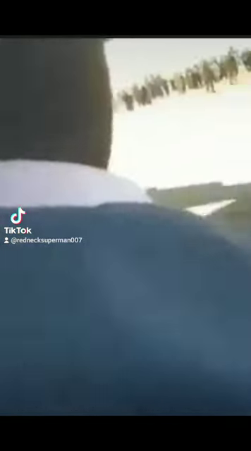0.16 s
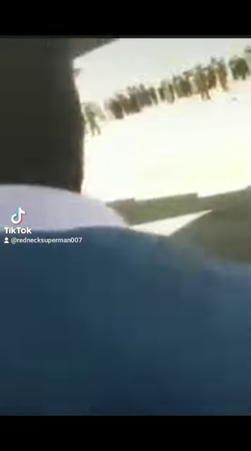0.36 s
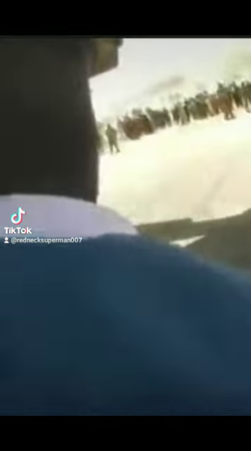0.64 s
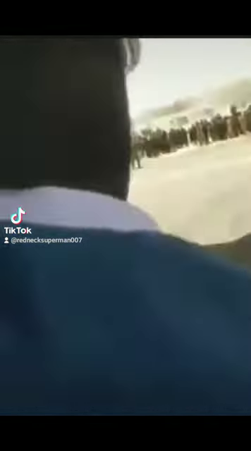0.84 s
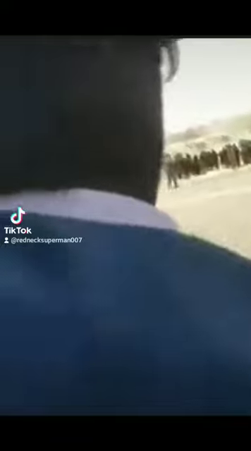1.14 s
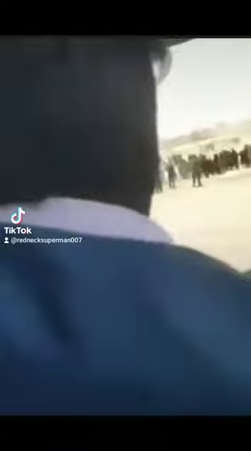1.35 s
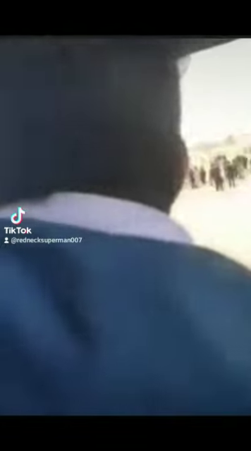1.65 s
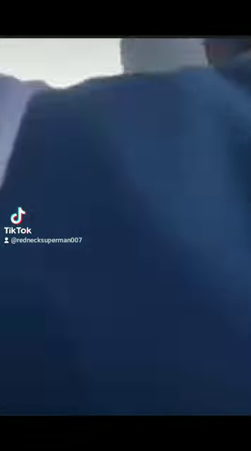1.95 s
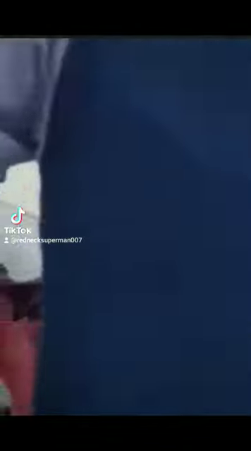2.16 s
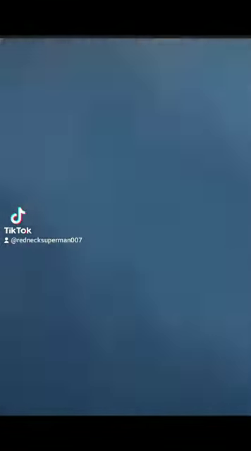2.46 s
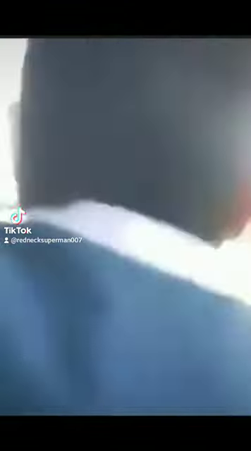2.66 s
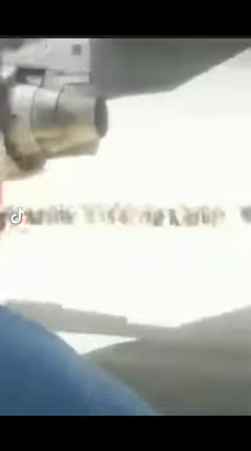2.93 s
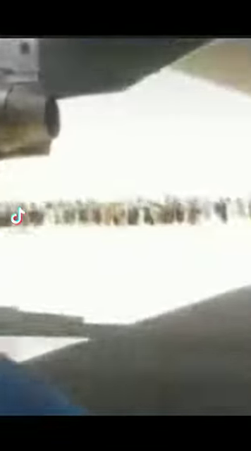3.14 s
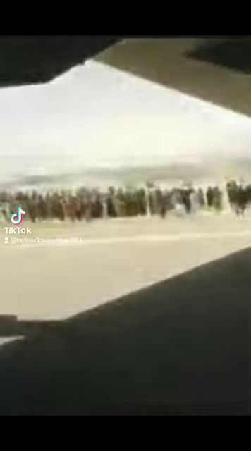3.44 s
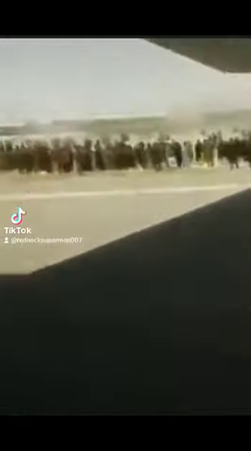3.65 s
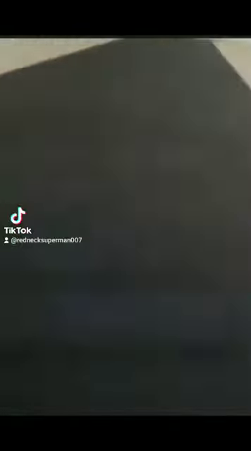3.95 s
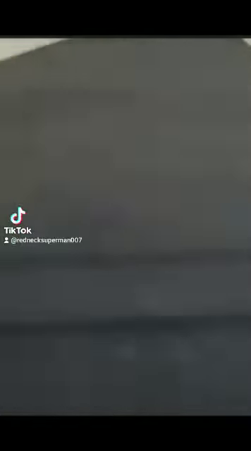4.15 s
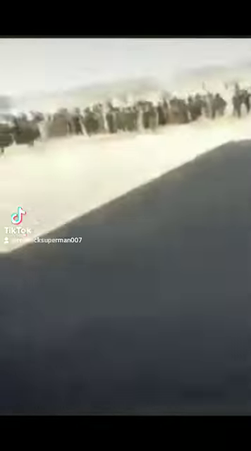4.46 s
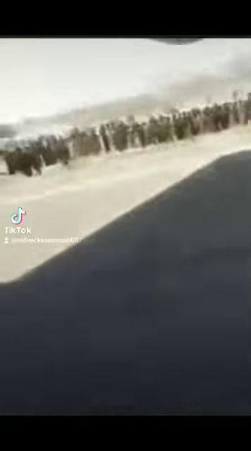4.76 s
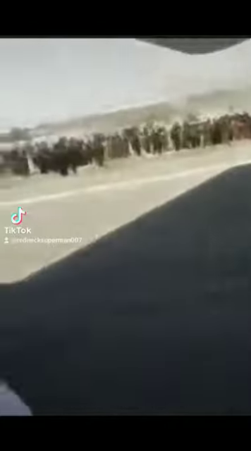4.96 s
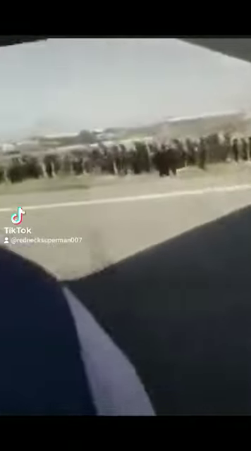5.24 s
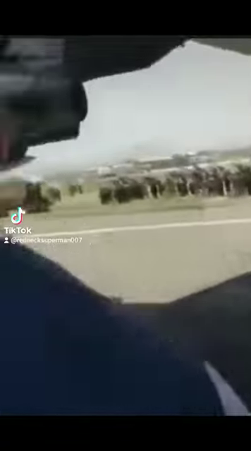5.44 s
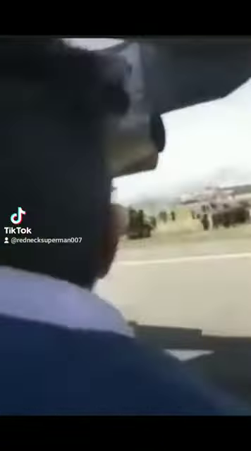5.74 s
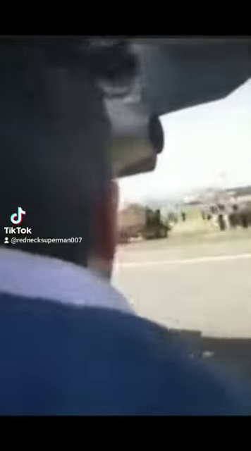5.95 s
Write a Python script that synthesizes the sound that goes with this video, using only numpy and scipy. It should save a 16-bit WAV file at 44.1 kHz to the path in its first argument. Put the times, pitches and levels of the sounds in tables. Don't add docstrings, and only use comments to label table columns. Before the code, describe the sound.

A harsh, loud engine blast passes, drops suddenly, then swells into steady jet roar with deep rumble and wavering fan howls.

```python
import sys
import numpy as np
from scipy import signal
from scipy.fft import rfft, irfft
from scipy.io import wavfile
from scipy.ndimage import uniform_filter1d

SR = 44100
rng = np.random.default_rng(int(sys.argv[2]) if len(sys.argv) > 2 else 0)


def output_pcm(signal):
    pcm = np.clip(np.atleast_2d(signal).T, -1, 1) * 32767
    wavfile.write(sys.argv[1], SR, np.round(pcm).astype(np.int16))


def amplitude_ratio(level_db):
    exponent = np.asarray(level_db, float) / 20
    return 10 ** exponent


N = 269010
SIZE, HOP = 1024, 256
HZ = np.fft.rfftfreq(SIZE, 1 / SR)
BIN_HZ = HZ[:, None]
TIMES = np.arange(N // HOP + 5) * HOP / SR
EARLY_END_S = 0.74


def engines():
    # (time [s], exposure [dB])
    exposure = [(0.0, 1), (0.3, 1.1), (0.42, 1), (0.54, 2), (0.6, -0.5), (0.71, -0.5), (0.77, -9),
                (1.1, -10.5), (1.72, -9), (1.95, -5), (2.12, -2.5), (2.6, -1.5), (3.9, -1), (4.4, -2),
                (4.6, -1.2), (5.4, -3), (6.1, -1.5)]
    steady_db = [-23.5, -26.5, -19.5]
    follows = [0.78, 0.89, 0.74]
    early_db = [-8, 1, -0.5]
    # (frequency [Hz], density [dB per Hz])
    rumble_spectrum = [(20, -54), (35, -30.5), (60, -11.5), (120, -4), (200, -6), (290, 1), (400, -0.5),
                       (550, -13), (900, -40.5)]
    blast_spectrum = [(250, -17.5), (500, -2.5), (780, 0.5), (1100, -4), (1800, -3), (2500, -5),
                      (3500, -11), (5000, -69)]
    roar_spectrum = [(1200, -55), (2200, -13), (3000, -4.5), (4000, 2.5), (5000, 1), (5800, -2.5),
                     (6500, -7.5), (7200, -15.5), (7550, -26), (7750, -38), (8080, -35), (8160, -63)]
    # (frequency [Hz], gain [dB])
    deep_bass = [(25, -16), (70, -18), (150, 1), (250, 3)]
    # (time [s], half length [s], gain [dB])
    gusts = [
        (1.3, 0.14, 3.5),
        (2.3, 0.61, 1.5),
        (4.1, 0.25, -1.5),
        (5.15, 0.039, 5),
        (5.6, 0.31, 1.5),
    ]
    early_tilt_db, early_chop_db = 1, 2.2

    early = 1 / (1 + np.exp((TIMES - EARLY_END_S) / 0.011))
    levels_db = np.c_[steady_db] + np.c_[follows] * over_time(exposure) + np.c_[early_db] * early
    rumble_db, blast_db, roar_db = levels_db

    rumble_db = rumble_db + swells(gusts)[0] + 3.0
    rumble = layer(rumble_spectrum, rumble_db, patchy_db=1.6, hz=90, s=0.05)
    held_down = np.clip(1.1 - TIMES / 1.1, 0, 2)
    rumble = rumble * amplitude_ratio(2 * over_hz(deep_bass) * held_down)

    tilt_db = early_tilt_db * np.outer(np.log2(HZ / 1000 + 0.26), early)
    blast_db = blast_db + early * blast_core_db() + 8.5 + tilt_db
    blast = layer(blast_spectrum, blast_db, patchy_db=2.5, hz=200, s=0.02)

    roar_db = roar_db + 5.5 + fan_howls_db()
    roar = layer(roar_spectrum, roar_db, patchy_db=2.5, hz=200, s=0.02)

    chop = amplitude_ratio(2 * early_chop_db * early * patches(700, 0.025))
    return np.sqrt(rumble + (blast + roar) * chop)


def blast_core_db():
    # (time [s], centre [Hz], level over the blast [dB])
    core = [
        (0.0, 1250, 1),
        (0.2, 1610, 0.5),
        (0.45, 2100, 6.5),
        (0.62, 2050, 2.5),
        (0.75, 1900, 8.5),
    ]
    core_hz, core_db = over_time(core)
    return core_db * np.exp(-((BIN_HZ - core_hz) / 320) ** 2)


def fan_howls_db():
    # (time [s], upper [Hz], lower [Hz], upper over the roar [dB], lower over the roar [dB])
    howls = [(0.0, 3830, 3110, -5, -1), (0.35, 3960, 3170, 3.5, 5.5), (0.7, 3770, 3060, 2.5, 3),
             (0.95, 3950, 2900, 7, 3), (1.3, 4040, 3040, 1.5, 4.5), (1.9, 4080, 3120, 0.5, 3.5),
             (2.4, 4030, 2930, 3.5, 4.5), (3.3, 3900, 3240, -0.5, 3), (3.65, 3920, 3070, 1.5, 3.5),
             (4.05, 4200, 2980, 0.5, 2), (4.3, 3970, 2950, -2.5, 5), (4.6, 4150, 2910, -2, 5),
             (4.95, 4000, 3140, 1.5, 2.5), (5.15, 3940, 2940, 4, 0), (5.7, 4010, 3090, 2.5, 5),
             (6.1, 4200, 3130, 2, 0)]
    howl_width_hz = [260, 240]
    wander_db, upper_trim_db = -1.86, -3
    upper_hz, lower_hz, upper_db, lower_db = over_time(howls)
    total_db = 0
    for hz, db, width_hz in zip((upper_hz, lower_hz), (upper_db + upper_trim_db, lower_db), howl_width_hz):
        hump = np.exp(-((BIN_HZ - hz) / width_hz) ** 2)
        total_db = total_db + (db + wander_db * wander()) * hump
    return total_db


def layer(spectrum, level_db, patchy_db, hz, s):
    power = amplitude_ratio(over_hz(spectrum)) ** 2
    return power / power.sum() * amplitude_ratio(level_db + patchy_db * patches(hz, s)) ** 2


def patches(hz, s):
    field = rng.standard_normal((len(TIMES), len(HZ))).T
    wide = max(round(hz * SIZE / SR), 1)
    long = max(round(s * SR / HOP), 1)
    for _ in range(2):
        field = uniform_filter1d(field, wide, axis=0)
        field = uniform_filter1d(field, long, axis=1)
    return evened(field)


def wander():
    wide = max(round(0.12 * SR / HOP), 1)
    drift = uniform_filter1d(rng.standard_normal(len(TIMES)), wide)
    return evened(uniform_filter1d(drift, wide))


def swells(rows):
    s, half_s, *columns = np.transpose(rows)
    bumps = np.exp(-((TIMES[:, None] - s) / half_s) ** 4)
    return [bumps @ c for c in columns]


def over_time(rows):
    s, *columns = np.transpose(rows)
    return [np.interp(TIMES, s, c) for c in columns]


def over_hz(points):
    hz, value = np.transpose(points)
    return np.interp(np.log(HZ + 1), np.log(hz + 1), value)[:, None]


def evened(x):
    return x / np.sqrt(np.mean(x ** 2) + 1e-20)


def ports():
    # (frequency [Hz], strength [ratio])
    aimed = [(60, 6.5), (200, 1.3), (600, 2.0), (1500, .75), (3000, .9), (4500, 0.22), (7000, 0.1)]
    # (frequency [Hz], share [ratio])
    phase_lead = [(150, 0.0087), (500, 0.11), (900, 0.93), (1400, 0.05)]
    most_alike = 2.05
    alike = None
    lag_ms, share = phone_swings()
    comb = np.cos(2 * np.pi * BIN_HZ * lag_ms / 1000)
    bass = (1.1 + 2.0 * np.clip(TIMES / 0.72, 0, 1) ** 4) * np.exp(-BIN_HZ / 225)
    scatter = 0.45 * patches(260, 0.022) + 0.1 * patches(350, 0.12)
    scatter = scatter * np.clip(BIN_HZ / 900, 0, 1)
    alike = over_hz(aimed) * (share + 0.14) * comb + bass + scatter
    alike = alike - body_echo() + reflections()
    alike = np.tanh(np.minimum(alike, most_alike))

    a, b, c, d = rng.standard_normal((len(TIMES), len(HZ), 4)).T
    lead = np.clip(over_hz(phase_lead), 0, 1)
    mid = a + 1j * b
    side = lead * 1j * mid + np.sqrt(1 - lead ** 2) * (c + 1j * d)
    mid = mid * np.sqrt((1 + alike) / 2)
    side = side * np.sqrt((1 - alike) / 2)
    return np.array([mid + side, mid - side])


def phone_swings():
    # (time [s], half length [s], extra lag [ms], extra share [ratio])
    swings = [(.4, 0.19, -0.02, -0.18), (.97, 0.035, -.08, 0.44), (1.2, 0.11, -0.085, 0.17),
              (1.6, 0.03, -0.14, 0.31), (1.95, 0.17, 0.027, -0.19), (2.27, 0.18, .12, 0.39),
              (2.6, 0.11, 0.1, 0.23), (2.85, 0.099, -0.023, 0.35), (3.35, 0.2, -0.016, 0.13),
              (3.78, 0.12, -0.034, 0.18), (4.05, 0.057, -0.054, 0.24), (4.55, 0.11, -0.054, 0.037),
              (4.83, 0.17, -0.08, 0.2), (5.1, 0.059, -0.052, 0.046), (5.33, 0.066, -0.029, -0.056),
              (5.7, 0.16, -0.012, 0.039), (6.0, 0.087, -0.048, 0.15)]
    rest_lag_ms, rest_share = 0.33, 0.27
    return np.c_[[rest_lag_ms, rest_share]] + swells(swings)


def body_echo():
    lag_ms, from_hz, end_s = 0.46, 1400, 1.7
    echo = np.cos(2 * np.pi * HZ * lag_ms / 1000) * np.clip(HZ / from_hz, 0, 1)
    near = 0.29 * np.exp(-(TIMES / end_s) ** 8)
    lit = 0.24 * np.exp(-(TIMES / EARLY_END_S) ** 8)
    return np.outer(echo, near + lit)


def reflections():
    # (time [s], half length [s], frequency [Hz], strength [ratio])
    joined = [(.05, 0.045, 2620, 0.97), (.16, .03, 5330, 0.9), (.41, 0.045, 2970, 1),
              (.42, 0.037, 5730, 0.73), (.52, 0.049, 3030, 0.94), (.61, 0.023, 3010, 0.83),
              (.79, 0.039, 2220, 1.2), (.97, 0.046, 3320, 1), (1.22, .05, 3260, 0.82),
              (1.34, 0.031, 5430, 0.84), (1.49, 0.029, 3270, 1.5), (1.56, .05, 5400, 1.6),
              (1.65, 0.043, 3280, 1.4), (1.82, .04, 2710, 1.2), (2.0, 0.014, 3500, 1.6),
              (2.05, 0.038, 2420, 1.7), (2.09, 0.047, 1810, 0.99), (2.14, 0.068, 2550, 0.93),
              (2.41, 0.061, 3620, 0.94), (2.42, 0.073, 2364, 1.15), (3.58, .04, 3600, 1),
              (3.91, 0.053, 2650, 0.99), (4.08, 0.032, 4810, 0.93), (4.15, 0.034, 2760, 0.84),
              (4.23, 0.033, 3700, 0.79), (4.53, 0.04, 3260, 1.4), (4.62, 0.037, 5340, 0.68),
              (5.09, 0.027, 4440, 0.65), (5.24, 0.026, 2260, 1.2), (5.27, 0.026, 2900, .9),
              (5.49, 0.029, 3100, .9), (5.66, 0.065, 3400, 1.4), (5.95, 0.045, 5800, 1.1)]
    # (time [s], half length [s], frequency [Hz], strength [ratio])
    opposed = [(0.102, 0.029, 4400, 0.57), (.22, 0.022, 4250, 1.5), (0.379, 0.035, 3960, 2),
               (.4, 0.071, 2387, 0.85), (0.627, 0.036, 4440, 2.4), (1.2, .06, 4520, 1.1),
               (1.7, 0.041, 4360, 1.3), (2.08, 0.026, 3280, 1.3), (2.34, 0.067, 5360, 1.3),
               (2.45, 0.098, 3090, 0.89), (2.633, 0.077, 2850, 1.4), (2.75, 0.048, 5350, 1.1),
               (2.77, 0.094, 3660, 0.88), (3.05, 0.048, 3630, 2.3), (4.39, 0.054, 1990, 2.3),
               (4.44, .04, 4400, 1.1), (4.74, 0.043, 2337, 1.4), (4.883, 0.034, 2176, 1.6),
               (4.916, 0.045, 1400, 2.3), (4.934, 0.092, 3400, 0.72), (5.153, 0.07, 3430, 1.4),
               (5.252, 0.052, 4470, 0.89), (5.37, .04, 1425, 1.5), (5.451, 0.066, 2530, 0.59),
               (.64, .025, 4000, 1.2), (.66, .04, 2430, 0.88), (1.16, 0.06, 2420, 1.06),
               (1.6, 0.026, 1240, 1.7), (2.26, 0.042, 1290, .9), (2.4, 0.038, 1010, 0.46),
               (2.66, 0.026, 1070, 1.2), (2.82, 0.034, 1605, 2.3), (2.9, 0.047, 1767, 1.26),
               (3.0, 0.045, 6200, 1.9), (3.21, 0.02, 1674, 1.3), (3.32, .03, 1510, 1.1),
               (3.37, 0.038, 2280, 0.9), (3.7, 0.057, 1690, 0.83), (3.73, 0.043, 2420, 1.1),
               (4.04, .04, 1555, 1.8), (4.64, .05, 1880, .9), (4.81, .04, 6550, 2.3),
               (5.09, 0.037, 1390, 1.5), (5.25, 0.053, 1814, 0.64), (5.68, 0.036, 1205, 1.1),
               (6.04, 0.039, 1870, 1.1)]
    return 1.55 * (blobs(joined) - blobs(opposed))


def blobs(rows):
    s, half_s, hz, strength = np.transpose(rows)
    across = strength * np.exp(-((BIN_HZ - hz) / 240) ** 2)
    along = np.exp(-((TIMES - s[:, None]) / half_s[:, None]) ** 4)
    return across @ along


def scene():
    sound = signal.istft(engines() * ports(), nperseg=SIZE, noverlap=SIZE - HOP)[1]
    return sound[:, :N] * amplitude_ratio(1.14)


def coarse_rounding(x, steps, size, start, jitter_db, spread_hz, band):
    bands = round(steps[-1][0] * 2 * size / SR / band)
    n = np.arange(2 * size) + 0.5
    k = np.arange(bands * band) + 0.5
    bell = np.kaiser(size + 1, 4 * np.pi)
    rise = np.sqrt(np.cumsum(bell[:size]) / bell.sum())
    window = np.r_[rise, rise[::-1]]
    basis = np.sqrt(2 / size) * window * np.cos(np.pi / size * np.outer(k, n + size / 2))

    count, lead_in = N // size + 3, 2 * size - start
    padding = ((0, 0), (lead_in, (count + 1) * size - N - lead_in))
    halves = np.pad([x[0] + x[1], x[0] - x[1]], padding).reshape(2, -1, size)
    lines = np.concatenate([halves[:, :-1], halves[:, 1:]], axis=2) @ basis.T

    spread = max(round(spread_hz * 2 * size / SR), 1)
    masker = uniform_filter1d((lines ** 2).mean(0), spread, axis=1)
    masker = uniform_filter1d(masker, size=3, axis=0)
    hz, db = np.transpose(steps)
    step_db = np.interp(np.log(k * SR / (2 * size)), np.log(hz), db)
    chance = rng.standard_normal((count, bands, 2)).transpose(2, 0, 1)
    lingering = 0.9 * chance + 0.44 * np.roll(chance, 1, axis=1)
    wobble_db = jitter_db * np.repeat(lingering, band, axis=2)
    step = np.sqrt(abs(masker) + 1e-20) * amplitude_ratio(step_db + wobble_db)

    blocks = (step * np.round(lines / step)) @ basis
    pair = (blocks[:, 1:, :size] + blocks[:, :-1, size:]).reshape(2, -1)
    pair = pair[:, size - start:][:, :N]
    return np.array([pair[0] + pair[1], pair[0] - pair[1]]) / 2


def top_band(x):
    # (frequency [Hz], gain [dB])
    copy_gain = [(8200, -53), (8450, -16), (9000, -20), (10000, -11.5), (11000, -19), (11700, -21.5),
                 (12200, -26), (12400, -42)]
    # (frequency [Hz], level [dB])
    fill_colour = [(8200, -54), (8450, -2), (9000, 0.5), (10000, -8.5), (11000, 1.5), (11600, 2.5),
                   (12000, -11.5), (12400, -28)]
    shift_hz, copy_db, fill_db = 7493, -3, -27
    f = np.fft.rfftfreq(N, 1 / SR)
    gain, colour = (amplitude_ratio(np.interp(f, *np.transpose(t), left=-120, right=-120))
                    for t in (copy_gain, fill_colour))
    shifted = np.roll(rfft(x), round(shift_hz * N / SR), axis=1)
    copy = irfft(shifted * gain, N)
    fill = evened(irfft(rfft(rng.standard_normal((N, 2)).T) * colour, N))
    loudness = np.sqrt(abs(uniform_filter1d((x ** 2).mean(0), size=2048)))
    return amplitude_ratio(copy_db) * copy + amplitude_ratio(fill_db) * loudness * fill


def soft_limit(x):
    knee, room = 0.56, 0.26
    bent = np.sign(x) * (knee + room * np.tanh((abs(x) - knee) / room))
    return np.where(abs(x) > knee, bent, x)


def top_cut(x):
    return signal.sosfilt(signal.butter(12, 12400, fs=SR, output="sos"), x)


def record(dry):
    # (frequency [Hz], step over the local level [dB])
    first_steps = [(150, -7), (600, -1), (1000, 7), (2000, 9), (3500, 9), (5000, 8), (6500, 9), (8150, 9)]
    second_steps = [(150, -22), (700, -12), (1200, -2), (2200, 2), (4000, -3), (5500, -3), (7000, 7),
                    (7500, 9), (7950, 12), (8700, 11), (9800, 6), (11600, 5), (12400, 13)]
    thin = coarse_rounding(dry, first_steps, 1664, 400, jitter_db=2.3, spread_hz=600, band=14)
    full = soft_limit(thin + top_band(thin))
    again = coarse_rounding(full, second_steps, 1024, 950, jitter_db=2.8, spread_hz=900, band=14)
    return top_cut(again)


dry = scene()
out = record(dry)
output_pcm(out)
```